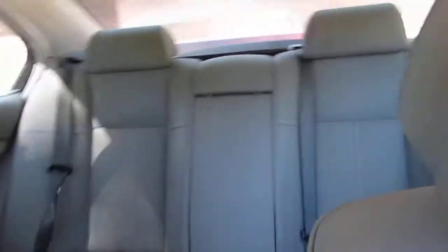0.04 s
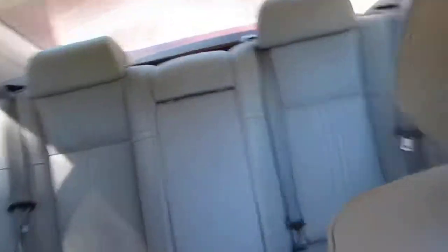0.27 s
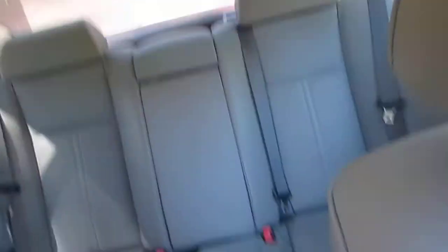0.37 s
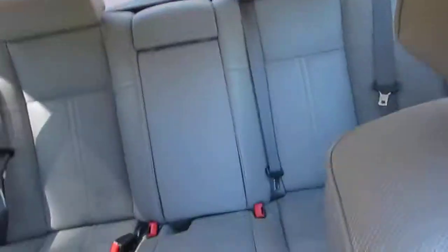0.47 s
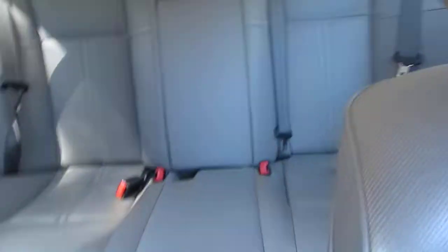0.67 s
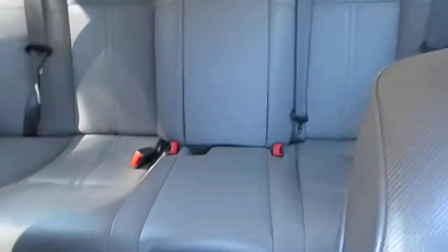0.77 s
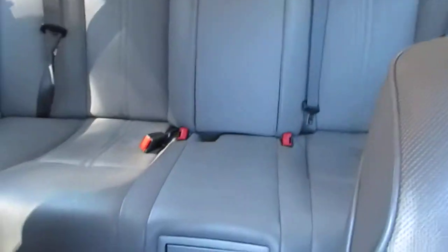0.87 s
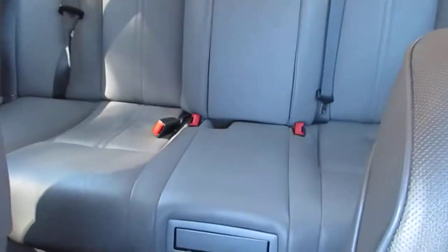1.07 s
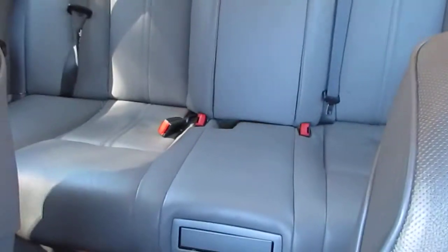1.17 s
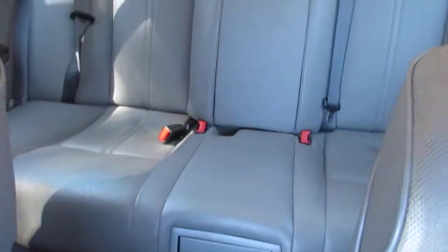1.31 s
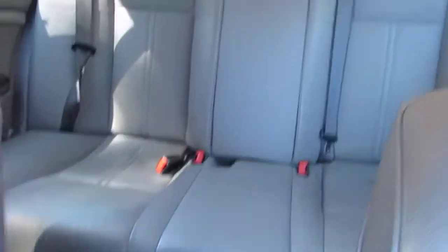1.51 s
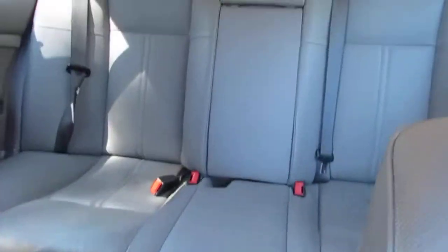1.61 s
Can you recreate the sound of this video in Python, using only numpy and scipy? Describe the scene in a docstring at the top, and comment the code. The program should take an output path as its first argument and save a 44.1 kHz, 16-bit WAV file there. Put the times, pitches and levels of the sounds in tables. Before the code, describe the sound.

A handled camera's plastic case snaps loudly, with faint cloth rustle and low car cabin hum.

```python
"""A faint swish of cloth over a steady rush of air and a low hum, inside a parked car.
A hand-held camera is being moved about. Its plastic case, right at the two microphones, creaks,
snaps once very loudly and clicks again: clicks and tiny slips set the shell's modes ringing.
A few soft knocks on the trim and a dull thump on the seat sound in the padded cabin."""
import sys
import numpy as np
from scipy import signal
from scipy.fft import rfft, irfft, next_fast_len
from scipy.io import wavfile

SR = 44100
rng = np.random.default_rng(int(sys.argv[2]) if len(sys.argv) > 2 else 0)


def transcribe(u):
    """Save the signal u as a 16-bit wav file named by the first command-line argument.

    u: samples, shape (n,) or (channels, n), limited to [-1, 1]; the rate is SR.
    q: integer samples, one column per channel.
    """
    v = np.clip(np.atleast_2d(u).T, -1, 1)
    q = np.round(v * 32767).astype(np.int16)
    wavfile.write(sys.argv[1], SR, q)


N = 72765
TIME = np.arange(N) / SR

# how alike the two microphones hear nearby sounds: frequency_hz, correlation
NEAR_CORRELATION = [(60, 1), (250, 0.94), (500, 1), (1000, 0.75), (1600, 1), (3500, 0.95), (7000, 0.88),
                    (14000, 0.34)]


def from_db(db):
    """Decibels to gain."""
    return 10 ** (np.asarray(db) / 20)


def rms_one(x):
    """Scale to unit rms."""
    return x / np.sqrt(np.mean(x ** 2) + 1e-20)


def at_hz(points, hz):
    """Read a table on a log-frequency axis."""
    frequencies, values = np.transpose(points)
    return np.interp(np.log(hz), np.log(frequencies), values)


def click(start_s):
    """A unit impulse."""
    return 1.0 * (np.arange(N) == round(start_s * SR))


def soften(x, hz):
    """A softer contact: one-pole low-pass."""
    pole = np.exp(-2 * np.pi * hz / SR)
    return signal.lfilter([1 - pole], [1, -pole], x + 1e-18)


def ring(x, hz, t60):
    """One mode: a unit click starts a sine of height 1 that falls 60 dB in t60 seconds."""
    radius = np.exp(-np.log(1000) / (t60 * SR))
    angle = 2 * np.pi * hz / SR
    return signal.lfilter([0, np.sin(angle)], [1, -2 * radius * np.cos(angle), radius ** 2], x + 1e-18)


def resonate(x, hz, width_hz):
    """A mode given by its bandwidth: the narrower, the longer it rings."""
    return ring(x, hz, t60=np.log(1000) / (np.pi * width_hz))


def stereo_noise(colour, correlation=NEAR_CORRELATION):
    """Noise in third-octave bands, each with its level and left-right correlation; rms 1."""
    edges = 20 * 2 ** (np.arange(30) / 3)
    white = rng.standard_normal((2, 2, N + SR // 4))
    out = 0
    for k, (low, high) in enumerate(zip(edges, edges[1:])):
        band = signal.butter(2, [low, high], "band", fs=SR, output="sos")
        mid, side = signal.sosfilt(band, white[k % 2])[:, -N:]
        hz = np.sqrt(low * high)
        alike = np.clip(at_hz(correlation, hz), -1, 1)
        pair = np.sqrt(1 + alike) * mid + np.sqrt(1 - alike) * side * [[1], [-1]]
        out += from_db(at_hz(colour, hz)) * pair
    return rms_one(out)


def blows(rows, attack_s):
    """Envelope of blows that rise quickly and die away, summed in power."""
    power = 0
    for start_s, db, t60, *_ in rows:
        age = np.maximum(TIME - start_s, 0)
        rise = 1 - np.exp(-age / attack_s)
        decay = np.exp(-np.log(1000) * age / t60)
        power += (from_db(db) * rise * decay) ** 2
    return np.sqrt(power)


def grains(per_s, spread_db):
    """Random tiny slips of uneven size."""
    sizes = from_db(spread_db * np.minimum(rng.exponential(1, N), 4))
    return sizes * rng.choice([-1, 1], N) * (rng.random(N) < per_s / SR)


def swell(middle_s, half_s):
    """A bell-shaped envelope."""
    return np.exp(-.5 * ((TIME - middle_s) / half_s) ** 2)


def cabin_air():
    """A steady rush all round the microphones, with a few wavering hums in it."""
    # spectrum of the rush: frequency_hz, relative_db
    colour = [(30, -21), (60, -7), (110, 1.5), (200, 2), (300, -0.5), (450, 0), (700, -5), (1100, -9.5),
              (1650, -14), (2200, -20), (4000, -23.5), (7000, -25), (11000, -30), (15500, -38)]
    # how alike the microphones hear it: frequency_hz, correlation
    correlation = [(60, 1), (150, 0.86), (280, 0.035), (500, -0.42), (800, -0.18), (1100, -0.1),
                   (1500, 0.48), (3000, 0.58), (6000, 0.21), (9000, 0.077), (15000, -0.13)]
    # narrow tones in the cabin: pitch_hz, width_hz, level_db
    tones = [(100.2, 8.6, -63), (202.1, 11, -58.5), (276.3, 21, -61.5), (394, 15, -68.5), (1672, 18, -68.5)]
    hums = 0
    for hz, width, db in tones:
        hum = resonate(rng.standard_normal(N + SR), hz, width)[SR:]  # a second to settle
        hums += from_db(db) * rms_one(hum)
    return from_db(-49) * stereo_noise(colour, correlation) + hums


def hand_rumble():
    """Handling noise: the hand rumbles as the camera swings."""
    # course of the rumble: time_s, level_db
    sway = [(0, -57), (.1, -56), (.33, -72), (.36, -50.5), (.385, -48), (.42, -50), (.46, -51.5),
            (.51, -59), (.62, -66), (.68, -55), (.85, -66.5), (1.4, -66), (1.52, -57.5), (1.65, -59)]
    # its spectrum: frequency_hz, relative_db
    colour = [(20, -7), (35, 4.5), (55, 3), (90, -12), (200, -35), (1000, -81)]
    return from_db(np.interp(TIME, *np.transpose(sway))) * stereo_noise(colour)


def cloth(hiss_db=-2, fibre_db=-4):
    """Cloth rubs nearby: a smooth hiss, and slipping fibres that excite resonances and briefly catch."""
    # course of the rubbing: time_s, relative_db
    swish = [(0, -47), (.08, -57.5), (.3, -76), (.42, -59.5), (.5, -53), (.62, -49.5), (.7, -52.5),
             (.76, -61), (.9, -65), (.955, -51.5), (1.1, -49.5), (1.2, -47.5), (1.32, -52), (1.48, -52),
             (1.55, -58), (1.65, -62.5)]
    # spectrum of the hiss: frequency_hz, relative_db
    colour = [(100, -8), (350, 4.5), (800, 3), (1600, 0), (2200, -4.5), (3500, -8.5), (6000, -14.5),
              (9000, -25), (15500, -27)]
    # resonances the fibres excite: pitch_hz, width_hz, relative_db
    resonances = [(827, 81, -1.5), (1464, 135, -1), (1705, 100, -4), (2200, 200, -7), (2850, 180, -10),
                  (3430, 350, -10.5), (4740, 760, -12.5), (5780, 400, -16), (7000, 780, -18)]
    # the cloth catches: middle_s, half_length_s, level_db
    catches = [(1.084, .0015, -51), (1.182, 0.0011, -50), (1.2475, 0.0018, -46), (1.421, .0015, -55),
               (1.595, 0.0044, -52.5)]
    level = from_db(np.interp(TIME, *np.transpose(swish)))
    slips = np.diff(grains(per_s=3000, spread_db=3), prepend=0)
    rub = sum((-1) ** k * from_db(db) * rms_one(resonate(slips, hz, width))
              for k, (hz, width, db) in enumerate(resonances))
    catching = sum(from_db(db) * swell(middle_s, half_s) for middle_s, half_s, db in catches)
    fibres = np.hypot(from_db(fibre_db) * level, catching) * rms_one(rub)
    hiss = from_db(hiss_db) * level * stereo_noise(colour)
    return hiss + fibres


def seat_thumps():
    """Padded blows set the low modes of seat and cabin booming."""
    # blows on the seat: start_s, thud_db, t60_s, boom_db
    hits = [(0.2093, -42.5, 0.062, -48), (.636, -37, 0.085, -38), (0.6522, -38, .14, -38.5)]
    # spectrum of the thud: frequency_hz, relative_db
    colour = [(60, -31.5), (130, -28), (200, -0.5), (330, 4.5), (550, -4), (900, -9.5), (1600, -6),
              (2400, -32), (10000, -51)]
    # modes of the seat: pitch_hz, gain_db, t60_s
    modes = [(203.1, 2, 0.24), (248, 2, 0.078), (274, -2.5, 0.11), (397, -7.5, .17)]
    force = sum(from_db(boom_db) * click(start_s) for start_s, _, _, boom_db in hits)
    boom = sum((-1) ** k * from_db(db) * ring(force, hz, t60) for k, (hz, db, t60) in enumerate(modes))
    thud = blows(hits, attack_s=0.00073) * stereo_noise(colour)
    return boom + thud


def trim_knocks():
    """Soft knocks on the cabin's trim: a dense clatter and a ringing panel."""
    # blows on the trim: start_s, clatter_db, t60_s, ring_db
    hits = [(.147, -40, 0.071, -58), (.157, -40, .042, -47), (0.2048, -37, 0.09, -43.5),
            (0.2239, -36.5, 0.031, -48), (.234, -39, .025, -47), (0.2986, -39, 0.036, -49.5),
            (0.4243, -36, 0.064, -37.5)]
    # spectrum of the clatter: frequency_hz, relative_db
    colour = [(100, -18.5), (250, -0.5), (550, -6.5), (920, 1.5), (1200, -4), (1600, -6), (2300, -11),
              (3100, -12), (5000, -25), (14000, -35)]
    # modes of the panel: pitch_hz, gain_db, t60_s
    modes = [(584, -10, 0.12), (916, 0, 0.1), (1264, -6.5, .03)]
    force = sum(from_db(ring_db) * click(start_s) for start_s, _, _, ring_db in hits)
    panel = sum(from_db(db) * ring(force, hz, t60) for hz, db, t60 in modes)
    clatter = blows(hits, attack_s=0.001) * stereo_noise(colour)
    return panel + clatter


def case_body(force, low_cut_hz=2100, left_lag_s=26e-6):
    """The case rings; each microphone hears its own blend of the modes, the left one slightly later."""
    # modes of the plastic shell: pitch_hz, left_gain_db, right_gain_db, t60_s
    modes = [(2910.0, -10.5, -9.2, 0.0034), (3900, -15, -35, 0.0068), (4300, -24.5, -18.5, 0.0257),
             (4880, -10, 3, 0.0025), (5530, -15.5, 4, 0.003), (6740, 7.5, 4, 0.0021),
             (8370, 8.5, 1.6, 0.0018), (8690, 0.5, -7.5, 0.0057), (9900, -4, -6.5, 0.0027),
             (10900, -17.0, -2, 0.0019), (12200, -23, -23, 0.0022), (15000, -15.7, -34, 0.0022)]
    # so small a shell radiates little bass
    force = signal.sosfilt(signal.butter(2, low_cut_hz, "high", fs=SR, output="sos"), force)
    left, right = sum((-1) ** k * from_db([[left_db], [right_db]]) * ring(force, hz, t60)
                      for k, (hz, left_db, right_db, t60) in enumerate(modes))
    size = next_fast_len(N)
    delay = np.exp(-2j * np.pi * np.fft.rfftfreq(size, 1 / SR) * left_lag_s)
    late_left = irfft(rfft(left, size) * delay, size)[:N]
    return np.array([late_left, right])


def case_creaks(direct_db=1.5):
    """Brief swells of tiny pitched slips, heard through the case and straight from where they rub."""
    # the plastic rubs: middle_s, half_length_s, level_db, pitch_hz, width_hz
    creaks = [(0.189, 0.011, -54, 7560, 600), (0.192, 0.0038, -50, 2900, 200),
              (.194, 0.0086, -42, 1520, 150), (.211, 0.0076, -47.5, 1790, 300),
              (0.239, 0.0058, -44, 2850, 500), (0.259, 0.0073, -45.5, 2663, 600),
              (0.3497, .0022, -43.5, 3150, 550), (0.3837, 0.0019, -36.5, 2850, 300),
              (0.3815, 0.0014, -38, 4230, 900), (0.426, .0042, -49, 3100, 800),
              (.698, 0.011, -62, 7900, 3970), (0.844, 0.0068, -58.5, 7980, 6000)]
    out = 0
    for middle_s, half_s, db, hz, width in creaks:
        slips = resonate(grains(per_s=2500, spread_db=2.5), hz, width)
        creak = rms_one(case_body(slips) + from_db(direct_db) * slips)
        out += from_db(db) * swell(middle_s, half_s) * creak
    return out


def case_snaps(tail_t60_s=0.056):
    """Hard clicks in the case, right at the microphones, with the cabin's short answer."""
    # the plastic snaps: start_s, force_db, brightness_hz, tail_db
    snaps = [(.2261, 0, 16000, -26), (.2300, -13.5, 7000, -38), (0.2309, -7.5, 2200, -45),
             (0.388, -25.5, 2000, -58), (0.3901, -11, 1990, -45), (.3906, -34, 4000, -58),
             (0.18, -44, 15000, -76), (.1905, -39, 15000, -68), (0.197, -50, 15000, -74),
             (.7288, -46.5, 15000, -77), (0.773, -44.5, 15000, -71)]
    # spectrum of the cabin's answer: frequency_hz, relative_db
    tail_colour = [(100, -16.5), (220, -1), (380, 0.5), (600, -6), (950, -3), (1350, 3), (2000, -8.5),
                   (3000, -2.5), (6500, -15), (10000, -22.5), (16000, -43)]
    force = sum(from_db(db) * soften(click(start_s), hz) for start_s, db, hz, _ in snaps)
    tail = blows([(start_s, tail_db, tail_t60_s) for start_s, _, _, tail_db in snaps], attack_s=0.0012)
    return case_body(force) + tail * stereo_noise(tail_colour)


def scene():
    """All sources at the two microphones."""
    handling = case_snaps() + case_creaks() + trim_knocks() + seat_thumps()
    return handling + cloth() + hand_rumble() + cabin_air()


def record(dry, whine_hz=15734, whine_db=-79.5, cutoff_hz=16300):
    """The camera's electronics add a faint whine, the loudest snap overloads the input, the top is cut."""
    whine = from_db(whine_db) * rms_one(np.sin(2 * np.pi * whine_hz * TIME))
    overloaded = np.tanh(dry + whine)
    return signal.sosfilt(signal.ellip(10, .1, 70, cutoff_hz, fs=SR, output="sos"), overloaded)


dry = scene()
out = record(dry)
transcribe(out)
```